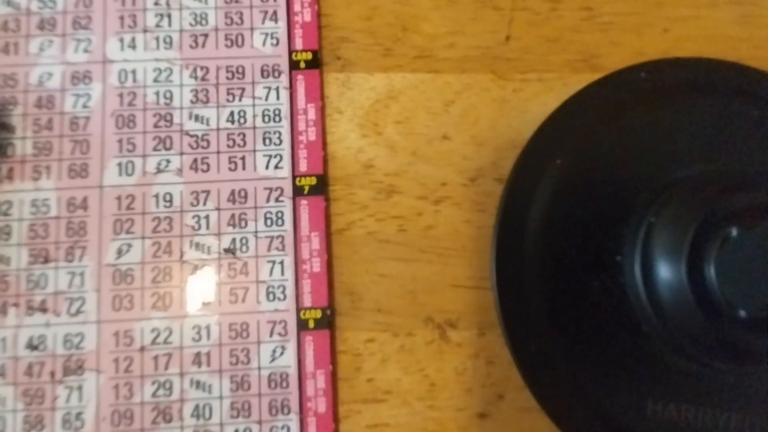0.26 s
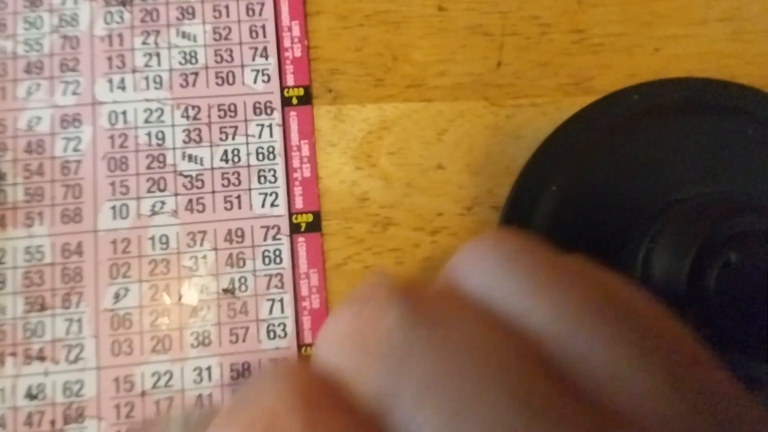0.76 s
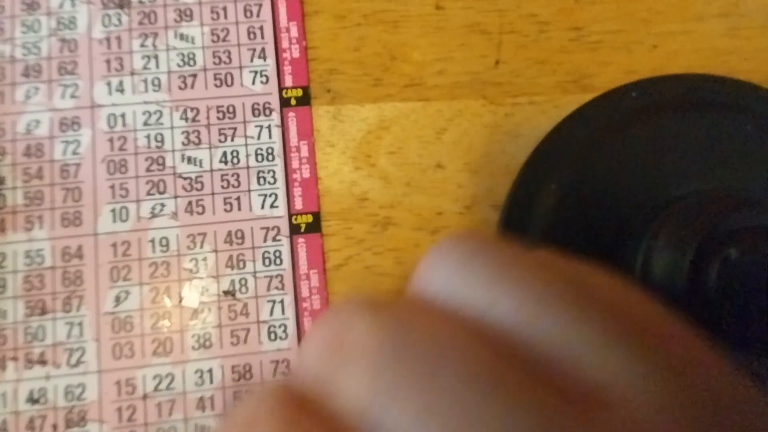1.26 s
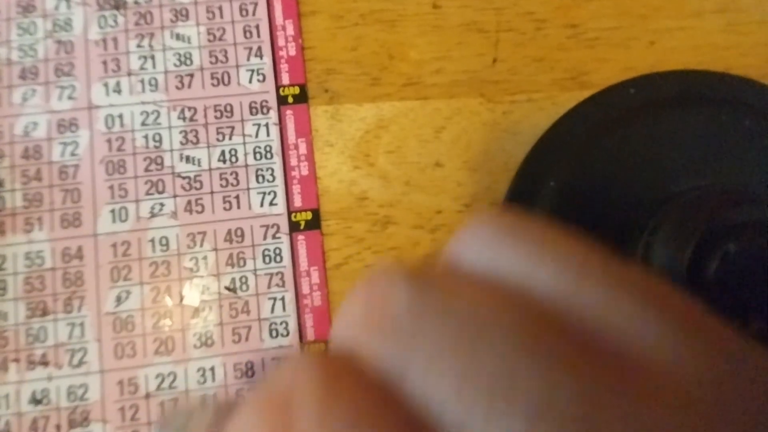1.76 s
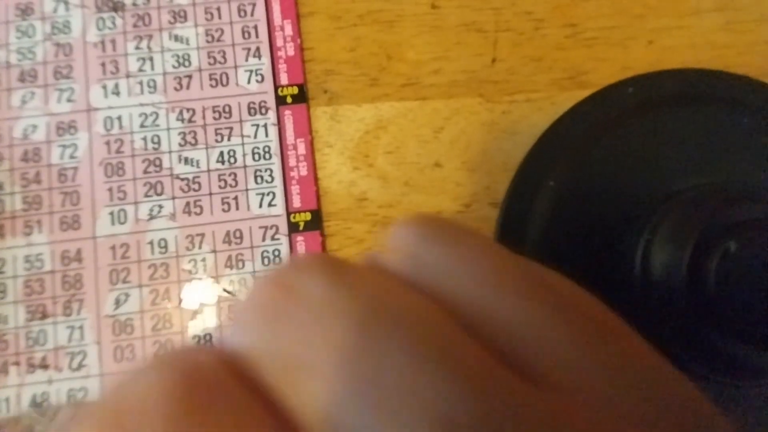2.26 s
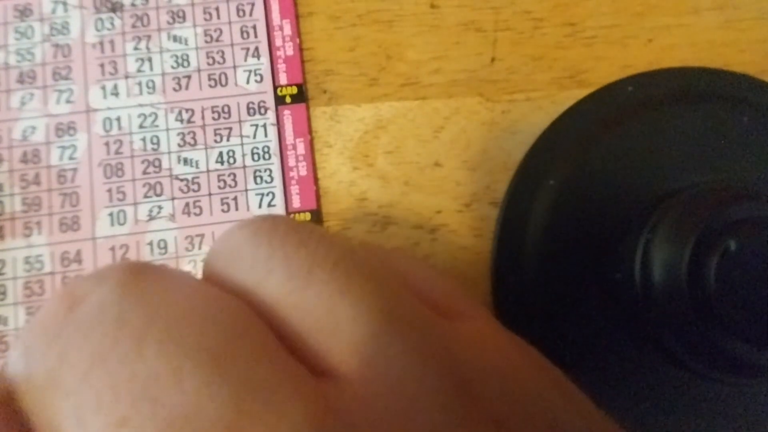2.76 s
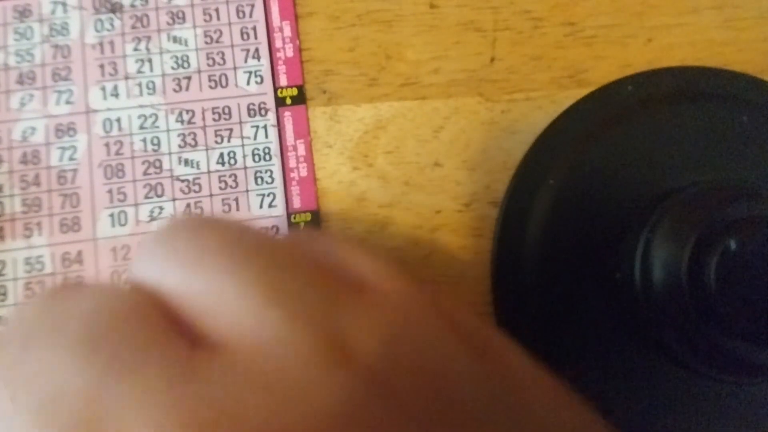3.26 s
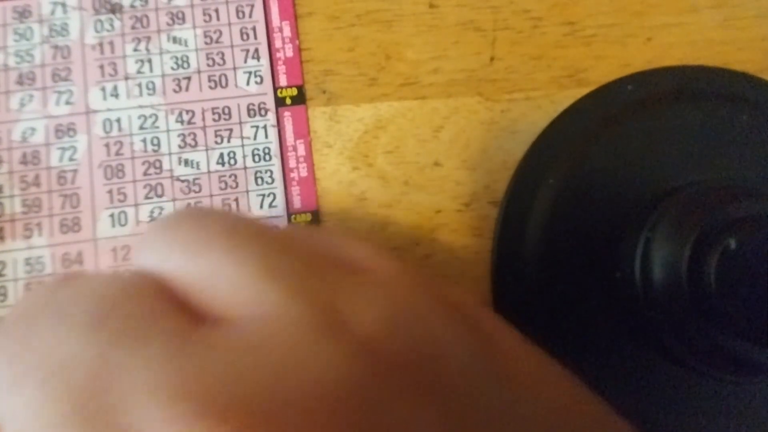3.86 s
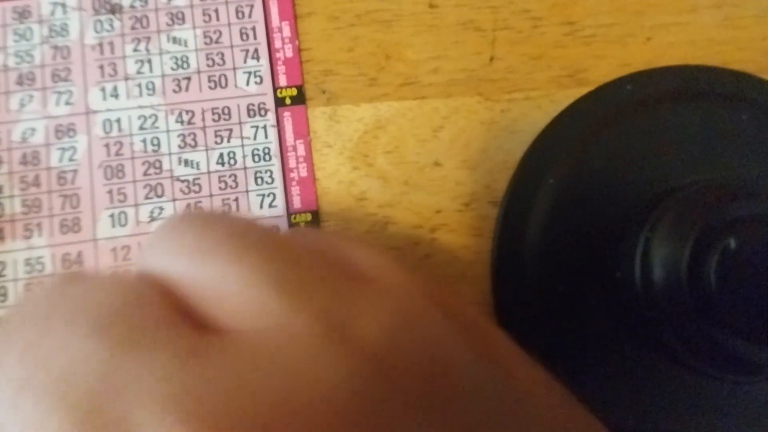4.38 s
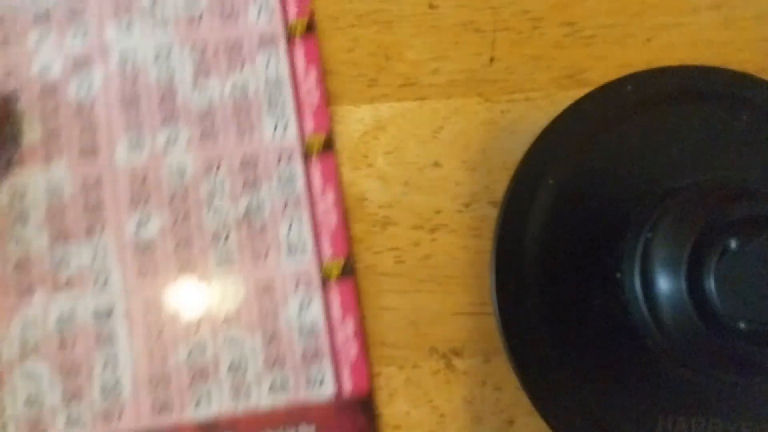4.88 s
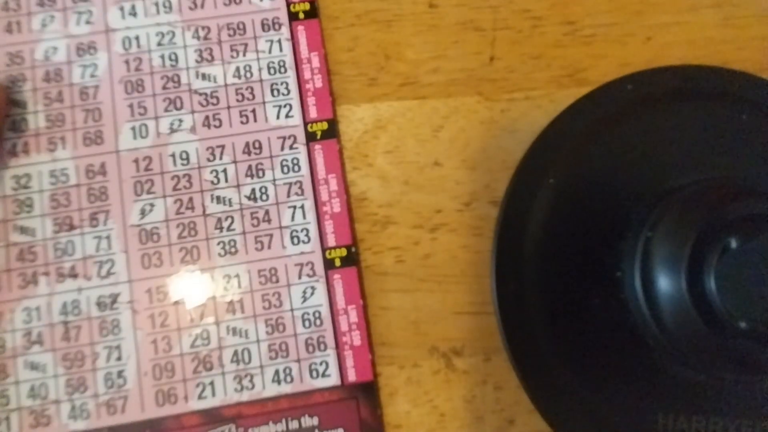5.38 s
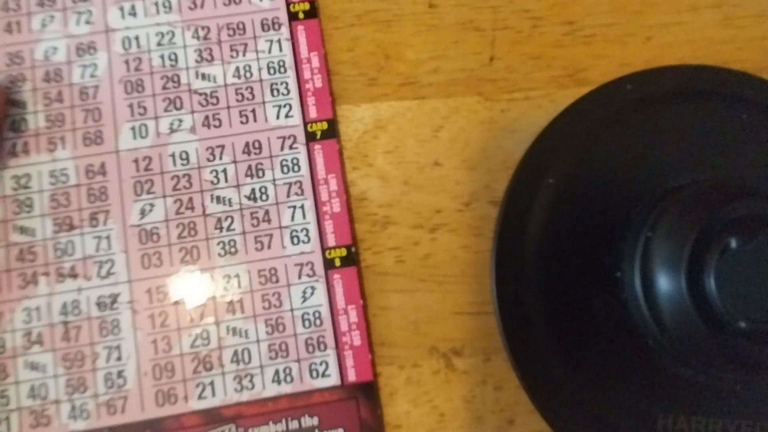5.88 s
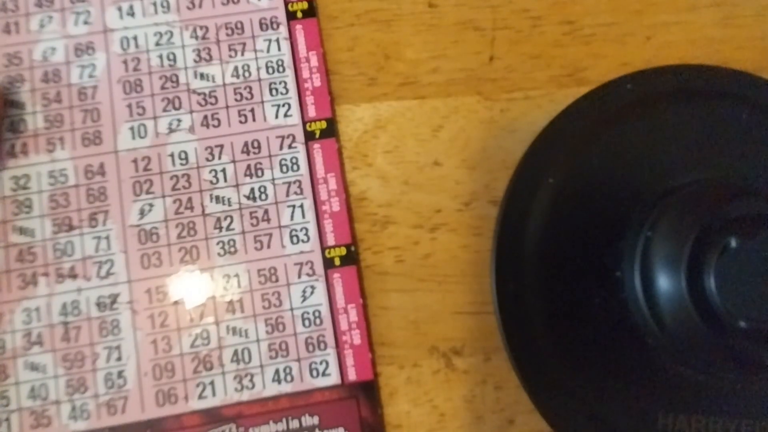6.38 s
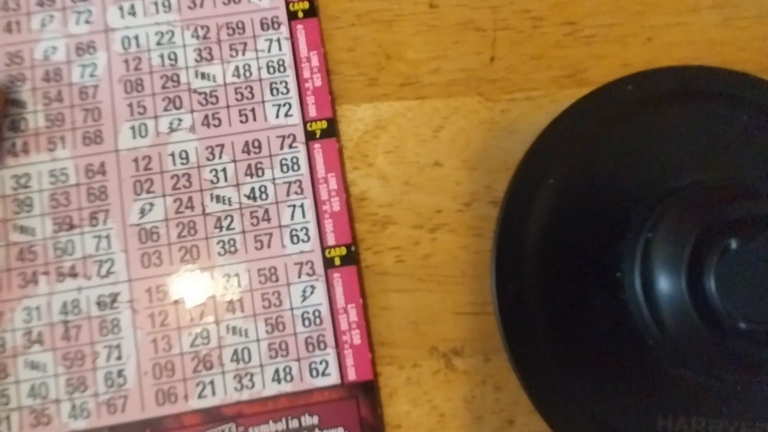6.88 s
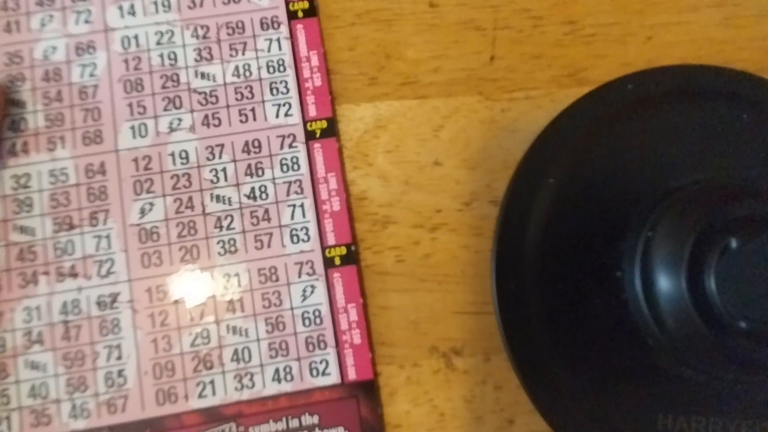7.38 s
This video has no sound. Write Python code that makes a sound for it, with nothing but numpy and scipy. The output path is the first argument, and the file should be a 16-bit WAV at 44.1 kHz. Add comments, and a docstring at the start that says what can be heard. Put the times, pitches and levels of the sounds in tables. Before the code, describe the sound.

A fan throbs and hums low throughout in a small room, heard through a stereo microphone close to a wooden desk. At the start a hand slides over a lottery ticket and picks up a coin, which clinks and knocks on the wood, sharpest at 0.5 seconds. From about 0.8 to 1.9 seconds the coin's edge scratches the card in quick, soft back-and-forth strokes, about ten a second. After a pause, a clink and knock at 3.2 seconds open a second, slightly hissier run, ending with a tap at 4.5 seconds. Around 4.8 seconds the hand swishes over the card with a light clink and a knock. A dull thump and small clink follow at 6.5 seconds, and faint brushing continues until about 7.6 seconds. From 1 to 7 seconds, a camera lens intermittently makes thin, faint ticks on the right.

```python
"""A wooden desk in a small room, stereo microphone close by; a fan throbs and hums throughout.
A hand slides over a lottery ticket and picks up a coin, which clinks and knocks on the wood.
The coin's edge scratches the card in two runs of quick back-and-forth strokes, near 1 s and from 3 s,
while a camera lens starts to tick faintly beside the right port of the microphone.
After 4.5 s come more clinks, knocks and lens ticks, and the hand brushes the card to the end."""
import sys
import numpy as np
from scipy import signal
from scipy.fft import rfft, irfft, next_fast_len
from scipy.io import wavfile

SR = 44100
rng = np.random.default_rng(int(sys.argv[2]) if len(sys.argv) > 2 else 0)


def log_audio(samples):
    """Write samples as a 16-bit WAV file to the path given in sys.argv[1]."""
    # one column per channel
    frames = np.atleast_2d(samples).T
    # limit to full scale, then quantise
    limited = np.clip(frames, -1, 1)
    pcm = np.round(limited * 32767).astype(np.int16)
    wavfile.write(sys.argv[1], SR, pcm)


N = 336483
TIME = np.arange(N) / SR

# Levels are relative within each table; pan_db is left over right.
# rumble spectrum of the fan's air: freq_hz, level_db
AIR_SPECTRUM = [(35, -9), (60, -10), (85, -6.5), (125, -5.5), (180, -10), (215, 0.5), (260, -7.5),
                (340, -9.5), (420, -15.5), (520, -18), (660, -20), (780, -40), (1000, -44.5)]
# faint room hiss, shaped by the microphone ports: freq_hz, level_db
ROOM_HISS_SPECTRUM = [(500, -3.5), (800, 4), (1000, 2), (1250, -7), (1600, -3), (2300, -1), (3300, -14),
                      (4400, -8), (5600, -20), (7200, -14), (8500, -27), (12500, -16.5), (16000, -24.5)]
# hum of the fan: multiple_of_turning_rate, level_db
FAN_HARMONICS = [(6, -61.5), (9, -74.5), (15, -72.5), (18, -59), (24, -53.5), (27, -62), (29, -59.5),
                 (30, -48), (31, -56), (32, -59.5), (33, -49.5), (35, -59.5), (36, -67.5), (41, -67.5),
                 (45, -62.5), (47, -63.5), (53, -68.5), (66, -76.5)]
# dips the microphone ports put on sharp sounds: centre_hz, width_hz, gain_db
PORT_DIPS = [(3150, 700, -6.5), (8700, 550, -4.5)]
# spells of the lens hunting for focus: start_s, end_s, typical_level_db
FOCUS_HUNTS = [(1.043, 1.942, -55.5), (4.079, 4.316, -45), (5.028, 5.26, -51.5), (5.48, 5.621, -53.5),
               (6.317, 6.659, -51)]
# hard stops of the lens: start_s, level_db
LENS_STOPS = [(1.313, -45.5), (1.729, -43), (6.573, -46.5), (6.596, -46.5), (6.863, -48)]
# shifts of the arm's weight on the desk: peak_s, hold_s, level_db
ARM_SHIFTS = [(.85, 0.32, -50.5), (2.6, 0.21, -54), (3.1, 1.43, -54.5), (4.852, 0.067, -47),
              (6.325, 0.22, -52)]
# sweeps of the hand over the card: peak_s, hold_s, level_db, rise_s, fall_s, pan_db
HAND_SWEEPS = [(0.12, 0.041, -62.5, 0.23, 0.11, 1), (0.428, 0.0046, -50, 0.013, 0.066, 6),
               (1.776, .05, -76.5, .05, 0.53, 0), (2.201, 0.066, -70.5, 0.045, .11, -5.5),
               (4.644, 0.024, -58.5, 0.063, 0.26, -2.5), (4.825, .11, -53, 0.03, 0.064, 3),
               (6.295, 0.049, -78.5, .1, 0.22, -1.5), (6.513, 0.016, -64, .012, .15, -3),
               (6.811, 0.013, -73, .08, .15, -1.5), (7.071, 0.034, -77, .15, 0.26, -4),
               (7.569, .005, -67, 0.017, .08, 4.5)]
# spectrum of skin on card: freq_hz, level_db
PALM_SPECTRUM = [(500, -14.5), (1200, -10.5), (2300, 3), (3300, -2.5), (4400, 3.5), (5600, 0.5), (7200, 1),
                 (8600, -14), (10500, -6.5), (13000, -0.5), (16000, -9.5)]
# modes of the desk with no hand on it: pitch_hz, level_db, t60_s
DESK_MODES = [(82.6, -14.5, 0.038), (109, -13.5, 0.052), (190, -10, .06), (245, -6.5, 0.029),
              (350, -9, 0.04), (492, -11, .04), (664, -9, .035), (780, -13.5, .05), (928.6, -6.5, 0.054),
              (1007, -5.5, 0.16), (1274, -23.5, 0.03), (1441, -10.5, 0.025), (1625, -14, 0.06),
              (1786, -9.5, 0.037), (2204, -11.5, .055), (2370, -16.5, 0.036)]
# blows on the desk: start_s, level_db, brightness_hz, hand_damping_per_s (at 1 kHz)
DESK_KNOCKS = [(0.4196, -23.5, 304, 14), (0.4287, -20, 799, 50), (0.4393, -18.5, 1210, 30),
               (.4448, -37, 1200, 35), (.492, -23, 1281, 60), (3.1965, -23.5, 1914, 4.6),
               (4.459, -26.5, 880, 40), (4.811, -28, 4900, 320), (4.8263, -13, 141, 62),
               (4.836, -27, 890, 74), (4.841, -14.5, 200.8, 7), (6.495, -31, 4040, 99),
               (6.525, -6.5, 201, 61), (6.534, -5, 107, 32), (6.554, -30.5, 930, 130)]
# modes of the coin, damped by fingers and desk: pitch_hz, level_db, t60_s
COIN_MODES = [(3450, -36.5, .025), (4767, -19.5, .006), (5600, -16.5, .009), (6337, -15.5, 0.011),
              (7030, -11, 0.0072), (7400, -8.5, 0.003), (8600, -30.5, 0.006), (11400, -8, 0.003),
              (12160, -12.5, 0.004), (13200, -19, 0.003), (14500, -22, .005)]
# hard contacts of the coin: start_s, level_db, brightness_hz, pan_db
COIN_CLINKS = [(0.161, -35, 5500, 1.5), (.417, -23, 4850, 3), (0.429, -15, 5980, -5),
               (0.4393, -10, 2700, 13.5), (.4448, -21.5, 4500, -8), (0.4735, -31, 6950, -1),
               (0.492, 2, 12000, -6), (.4933, -11.5, 12270, -8), (0.6983, -27.5, 2980, 13),
               (1.998, -44, 12100, 4), (3.193, -17, 5870, 13), (4.46, -31, 3200, -5),
               (4.8102, -23.5, 6740, 10.5), (4.827, -30, 7950, 14), (6.4955, -32, 5070, -11.5),
               (6.783, -41.5, 4030, -1.5)]
# resonances of the card under the coin: pitch_hz, level_db, t60_s
CARD_MODES = [(662, 10.5, 0.0027), (904, -7, 0.031), (1463, 0, 0.0061), (2260, -0.5, 0.002)]
# hiss spectrum of the coin's edge on the coating: freq_hz, level_db
SCRATCH_SPECTRUM = [(1500, 0), (3200, -10.5), (4100, -1), (5100, 2), (6200, -4), (7500, -6.5), (8600, -19),
                    (10800, -13.5), (12500, -17.5), (16000, -19.5)]
# runs, each with its own grip: start_s, end_s, stroke_width_s, hiss_over_rasp_db, push_hiss_db, pan_db
SCRATCH_RUNS = [(.75, 1.9, 0.043, -14.5, 5, 0), (3.15, 4.55, 0.037, -8.5, 4.5, 1)]
# strokes of the coin, pull and push in turn: middle_s, level_db
COIN_STROKES = [(.833, -55), (0.938, -51), (1.041, -49.5), (1.14, -49), (1.239, -44.5), (1.33, -47.5),
                (1.429, -54), (1.527, -52), (1.619, -50), (1.718, -47), (1.81, -54), (3.243, -48),
                (3.359, -52.5), (3.456, -51), (3.551, -51.5), (3.652, -49), (3.754, -47.5), (3.851, -49),
                (3.956, -51), (4.059, -49), (4.159, -50.5), (4.249, -51.5), (4.351, -56), (4.453, -53.5)]


def from_db(db):
    """Decibels to gain."""
    return 10 ** (np.asarray(db) / 20)


def unit_rms(x):
    """Scale to unit rms."""
    return x / np.sqrt(np.mean(x ** 2) + 1e-20)


def colour(x, spectrum):
    """Shape a steady signal with a spectrum read on a log-frequency axis; rms 1."""
    size = next_fast_len(N)
    hz, db = np.transpose(spectrum)
    bins_hz = np.fft.rfftfreq(size, 1 / SR)
    gain = from_db(np.interp(np.log(bins_hz + 1e-3), np.log(hz), db))
    return unit_rms(irfft(rfft(x, size) * gain, size)[..., :N])


def cut(x, hz, kind, order=2):
    """Butterworth low- or high-pass."""
    return signal.sosfilt(signal.butter(order, min(hz, .45 * SR), kind, fs=SR, output="sos"), x)


def band(x, low_hz, high_hz):
    """Keep a band with steep edges."""
    return cut(cut(x, low_hz, "high", order=4), high_hz, "low", order=4)


def pan(pan_db):
    """Left and right gain."""
    return from_db(np.array([[.5], [-.5]]) * pan_db)


def add(track, start_s, sound):
    """Mix a short sound in at a given time."""
    start = int(start_s * SR)
    track[..., start:start + sound.shape[-1]] += sound[..., :N - start]


def swell(peak_s, hold_s, rise_s, fall_s):
    """Attack, hold and release of a movement; rise and fall are the times for a tenfold change."""
    before = np.maximum(peak_s - TIME, 0) / rise_s
    after = np.maximum(TIME - peak_s - hold_s, 0) / fall_s
    return 10 ** -(before + after).clip(0, 10)


def burst(t60_s, size):
    """Dying stereo noise of unit energy."""
    noise = rng.standard_normal((2, size)) * from_db(-60 * np.arange(size) / SR / t60_s)
    return noise / np.sqrt(np.sum(noise ** 2, axis=1, keepdims=True))


def grains(per_s, spread_db):
    """Tiny slips of uneven size, scattered by the card on their way to each channel."""
    sizes = from_db(spread_db * np.minimum(rng.exponential(1, N), 3))
    slipping = rng.random(N) < per_s / SR
    return slipping * sizes * rng.standard_normal((2, N))


def ring(force, modes):
    """Modes driven by a force; each reaches the two channels with its own strength."""
    out = 0
    for k, (hz, db, t60_s) in enumerate(modes):
        decay, angle = from_db(-60 / (t60_s * SR)), 2 * np.pi * hz / SR
        wave = signal.lfilter([0, np.sin(angle)], [1, -2 * decay * np.cos(angle), decay ** 2],
                              force + 1e-18)
        out = out + (-1) ** k * wave * from_db(db + rng.normal(0, 1, (2, 1)))
    return out


def desk_ring(force, damping=0, rocking_hz=(850, 1100)):
    """The desk rings, damped by a resting hand; rocking modes reach the two ports in opposite phase."""
    modes = [(hz, db, 1 / (1 / t60_s + damping * hz / 1000)) for hz, db, t60_s in DESK_MODES]
    rocking = [mode for mode in modes if rocking_hz[0] < mode[0] < rocking_hz[1]]
    in_phase = [mode for mode in modes if mode not in rocking]
    return ring(force, in_phase) + ring(force, rocking) * [[1], [-1]]


def room(x, early_db, tail_db, tail_t60_s=.22):
    """Quick reflections from desk and hand, then the small room's tail; the bass arrives direct."""
    echoes = from_db(early_db) * burst(t60_s=.02, size=20000)
    tail = from_db(tail_db) * burst(tail_t60_s, size=20000)
    gap = int(.007 * SR)
    echoes[:, gap:] += tail[:, :-gap]
    return x + signal.oaconvolve(x, cut(echoes, 170, "high"), axes=1)[:, :N]


def microphone_ports(x):
    """Each port cavity swallows a narrow band."""
    for hz, width_hz, gain_db in PORT_DIPS:
        cavity = signal.lfilter(*signal.iirpeak(hz, hz / width_hz, fs=SR), x)
        x = x - (1 - from_db(gain_db)) * cavity
    return x


def air(rumble_db=-49, hiss_db=-68.5, side_db=-11):
    """Room tone: moving air rumbles much alike in both channels and hisses apart."""
    mid, side = rng.standard_normal((2, N))
    draught = mid + from_db(side_db) * side * [[1], [-1]]
    rumble = colour(cut(draught, 670, "low", order=4), AIR_SPECTRUM)
    hiss = colour(rng.standard_normal((2, N)), ROOM_HISS_SPECTRUM)
    return from_db(rumble_db) * rumble + from_db(hiss_db) * hiss


def fan(turns_per_s=6.8785, throb_at_s=.143, waver=.12):
    """The harmonics of the fan's turning rate swell together once a turn and waver a little."""
    angle = 2 * np.pi * turns_per_s * (TIME - throb_at_s)
    knots_s = np.linspace(0, TIME[-1], num=40)
    hum = np.zeros(N)
    for multiple, db in FAN_HARMONICS:
        sway = 1 + waver * np.interp(TIME, knots_s, rng.standard_normal(len(knots_s)))
        phase = multiple * angle + .45 * rng.standard_normal()
        hum += np.sqrt(2) * from_db(db) * sway * np.cos(phase)
    return hum * np.minimum(TIME / .01, 1)


def lens(gain_db=20, pan_db=-6, ticks_per_s=24, uneven_db=4):
    """Thin, high ticks beside the right port: uneven steps as the lens hunts, and a few hard stops."""
    out, ticks = np.zeros((2, N)), list(LENS_STOPS)
    for start_s, end_s, db in FOCUS_HUNTS:
        gap_jitter, level_jitter = rng.standard_normal((40, 2)).T
        times = start_s + np.cumsum(np.exp(.5 * gap_jitter)) / ticks_per_s
        ticks += [(s, db + uneven_db * jitter) for s, jitter in zip(times, level_jitter) if s < end_s]
    tick = burst(t60_s=.0081, size=600)
    for start_s, db in ticks:
        add(out, start_s, from_db(db) * tick)
    treble = cut(out + 1e-18, 11000, "high", order=8)
    return from_db(gain_db) * pan(pan_db) * cut(treble, 13500, "low")


def arm():
    """The weight of the arm makes the desk rumble whenever it shifts."""
    rumble = unit_rms(band(rng.standard_normal(N), low_hz=55, high_hz=100))
    return rumble * sum(from_db(db) * swell(peak_s, hold_s, rise_s=.16, fall_s=.46)
                        for peak_s, hold_s, db in ARM_SHIFTS)


def brushing(desk_db=-7):
    """Skin on glossy card gives a fine, bright swish with each sweep; the desk murmurs under it."""
    sweeps = sum(from_db(db) * pan(pan_db) * swell(peak_s, hold_s, rise_s, fall_s)
                 for peak_s, hold_s, db, rise_s, fall_s, pan_db in HAND_SWEEPS)
    slips = grains(per_s=12000, spread_db=2)
    murmur = unit_rms(band(desk_ring(slips, damping=90), low_hz=450, high_hz=700))
    return sweeps * (colour(slips, PALM_SPECTRUM) + from_db(desk_db) * murmur)


def knocks(slap_db=11, pan_db=-2):
    """A soft contact stirs only the low modes of the desk; the card slaps on the wood with it."""
    out, blow = np.zeros((2, N)), signal.unit_impulse(9000)
    for start_s, db, brightness_hz, damping in DESK_KNOCKS:
        slap = from_db(slap_db) * cut(burst(t60_s=.02, size=len(blow)), 300, "high")
        knock = cut(desk_ring(blow, damping) + slap, brightness_hz, "low")
        add(out, start_s, from_db(db) * knock)
    return pan(pan_db) * out


def clinks(crack_db=5):
    """Metal meets wood: a sharp crack and a short ring of the coin, duller for a glancing touch."""
    out, blow = np.zeros((2, N)), signal.unit_impulse(2000)
    for start_s, db, brightness_hz, pan_db in COIN_CLINKS:
        crack = from_db(crack_db) * cut(burst(t60_s=.0023, size=len(blow)), 6700, "high")
        clink = cut(ring(blow, COIN_MODES) + crack, brightness_hz, "low")
        left, right = from_db(db) * pan(pan_db) * clink
        left_lag_s = -7.5e-5 * np.tanh(pan_db / 3)   # the farther port hears it later
        add(out[0], start_s + left_lag_s, left)
        add(out[1], start_s, right)
    return out


def strokes(push_pan_db=3):
    """Every run begins with a pull; on each push the edge digs in and hisses more, further left."""
    for start_s, end_s, width_s, hiss_db, push_db, pan_db in SCRATCH_RUNS:
        run = [(middle_s, db) for middle_s, db in COIN_STROKES if start_s < middle_s < end_s]
        for k, (middle_s, db) in enumerate(run):
            push = k % 2
            yield middle_s, width_s, db, db + hiss_db + push * push_db, pan_db + push * push_pan_db


def scratching(desk_db=-8, grip_db=2.2, detune=.028):
    """The coin's edge breaks the coating into grains; strokes swell with speed and rest at the turn."""
    slips = grains(per_s=4500, spread_db=3.7)
    hiss = colour(slips, SCRATCH_SPECTRUM)
    t, out = np.arange(-.09, .09, 1 / SR), np.zeros((2, N))
    knots_s = np.linspace(t[0], t[-1], 40)
    for middle_s, width_s, rasp_db, hiss_db, pan_db in strokes():
        start = int((middle_s + t[0]) * SR)
        span = slice(start, start + len(t))
        speed = 1 / (1 + np.abs(2 * t / width_s) ** 2.72)
        # the edge catches and lets go every few milliseconds
        grip = from_db(grip_db * np.interp(t, knots_s, rng.standard_normal(len(knots_s))))
        # each spot on the card rings a little differently
        modes = [(hz * np.exp(detune * rng.standard_normal()), db, t60) for hz, db, t60 in CARD_MODES]
        rasp = unit_rms(cut(ring(slips[:, span], modes), 2900, "low", order=3))
        stroke = from_db(rasp_db) * rasp + from_db(hiss_db) * pan(pan_db) * hiss[:, span]
        out[:, span] += speed * grip * stroke
    desk = unit_rms(desk_ring(cut(out.mean(axis=0), 1390, "high")))   # the wood below rings along
    return out + from_db(desk_db) * np.std(out) * desk


def scene(wood_db=5, metal_db=.5):
    """Small sounds on the desk, close to the microphone, over the hum of the room."""
    rubbing = room(scratching() + brushing(), early_db=-3, tail_db=-11.5)
    metal = room(from_db(metal_db) * clinks(), early_db=-10.5, tail_db=-15.5)
    wood = room(from_db(wood_db) * knocks(), early_db=-3.5, tail_db=-8.5)
    return rubbing + microphone_ports(metal + wood) + arm() + lens() + fan() + air()


def record(dry):
    """The deepest bass is taken away; the recorder clips at full scale and cuts the top."""
    clipped = np.clip(cut(dry, 34, "high", order=4), -1, 1)
    top_cut = signal.ellip(10, .2, 80, 16200, fs=SR, output="sos")
    return signal.sosfilt(top_cut, clipped)


dry = scene()
out = record(dry)
log_audio(out)
```